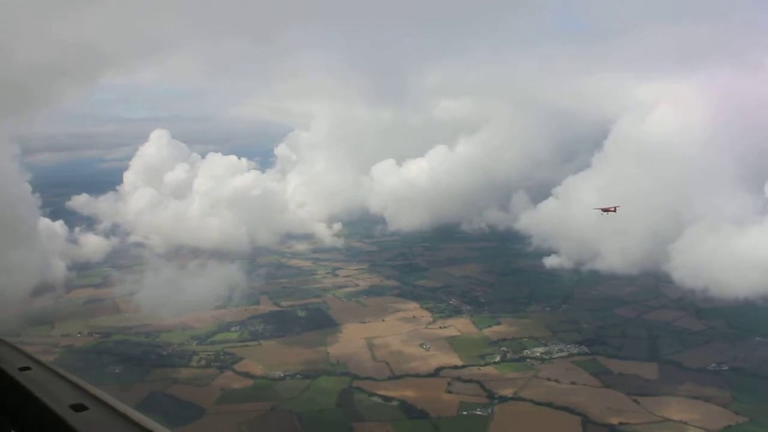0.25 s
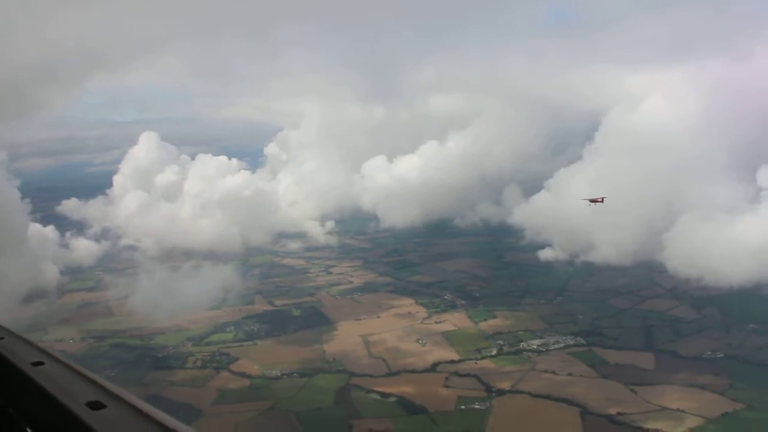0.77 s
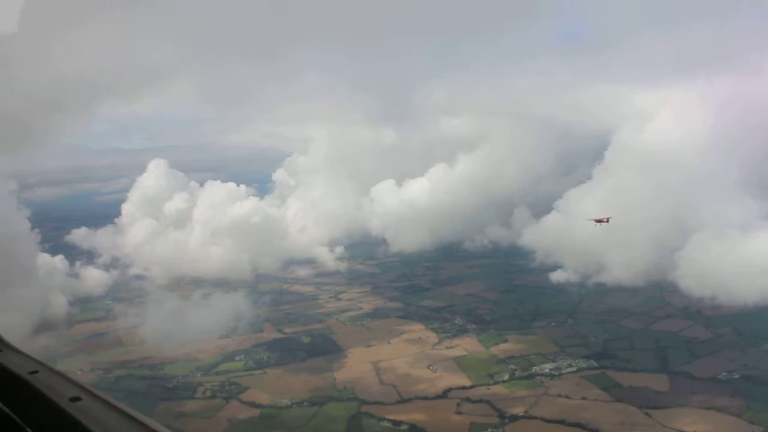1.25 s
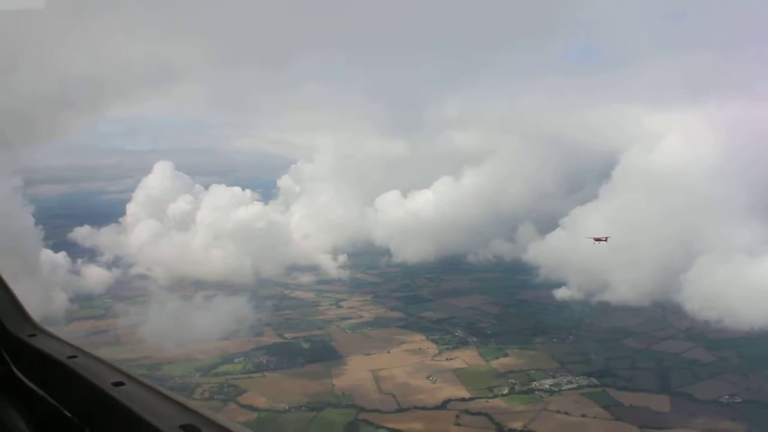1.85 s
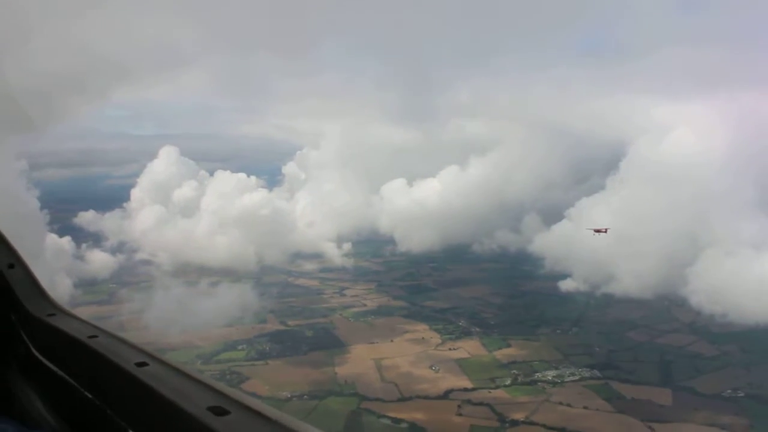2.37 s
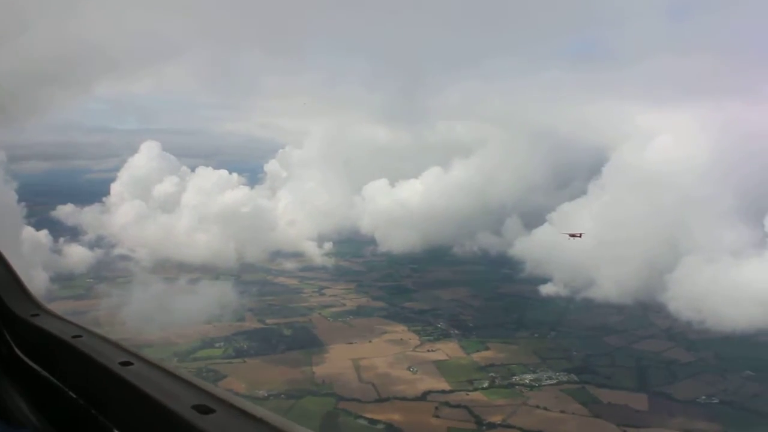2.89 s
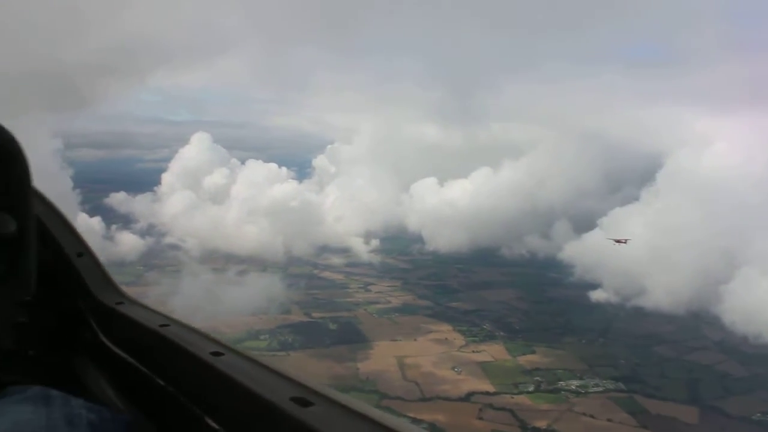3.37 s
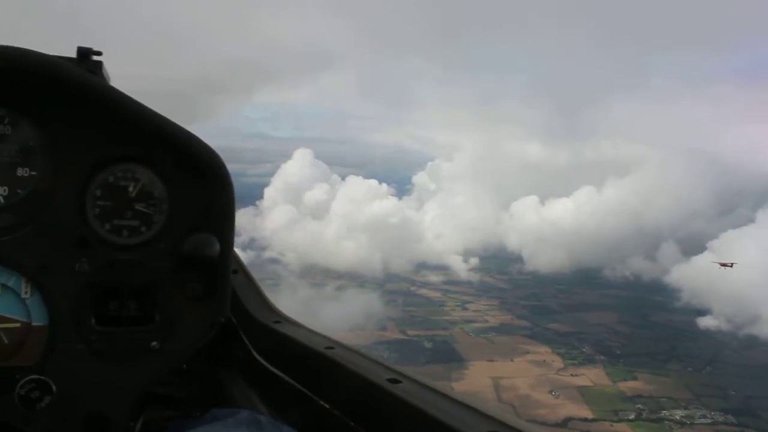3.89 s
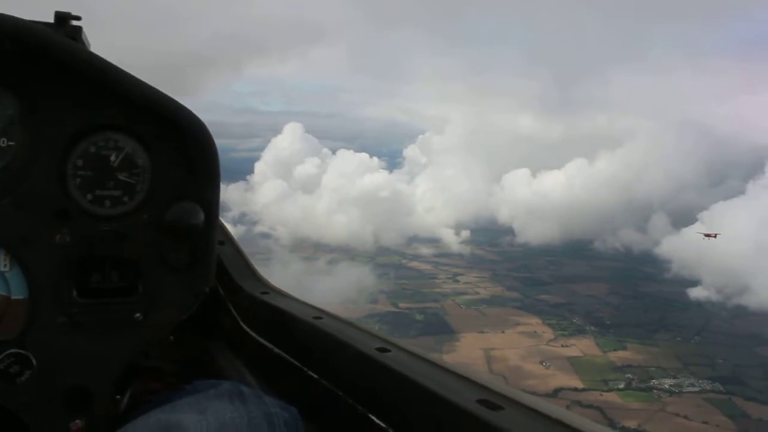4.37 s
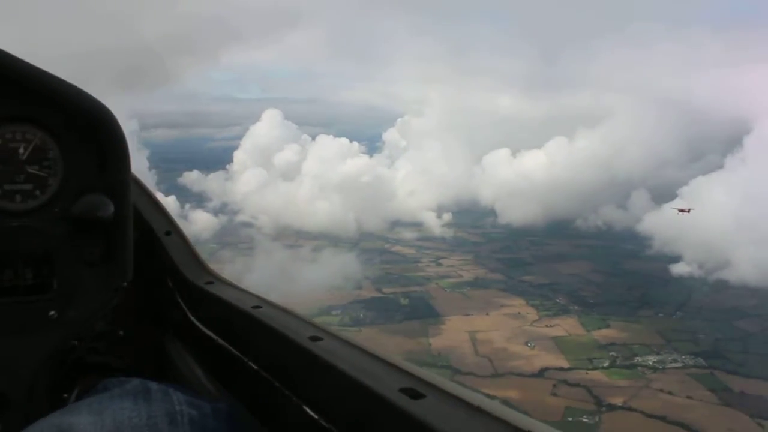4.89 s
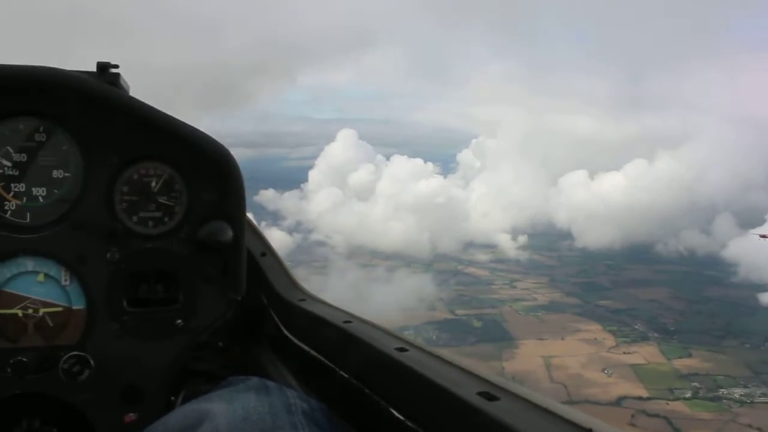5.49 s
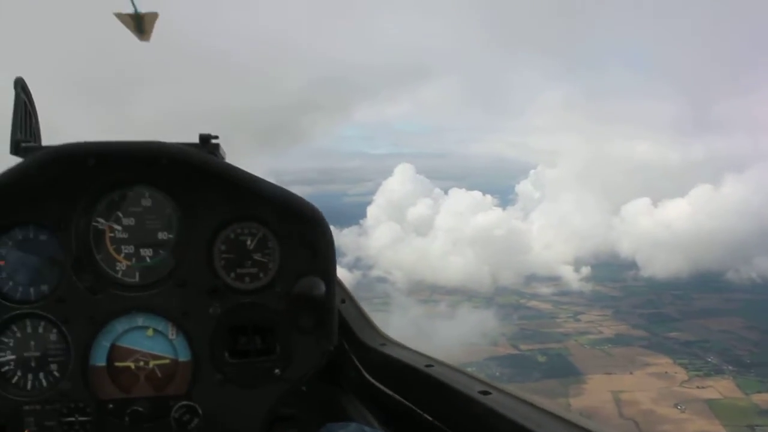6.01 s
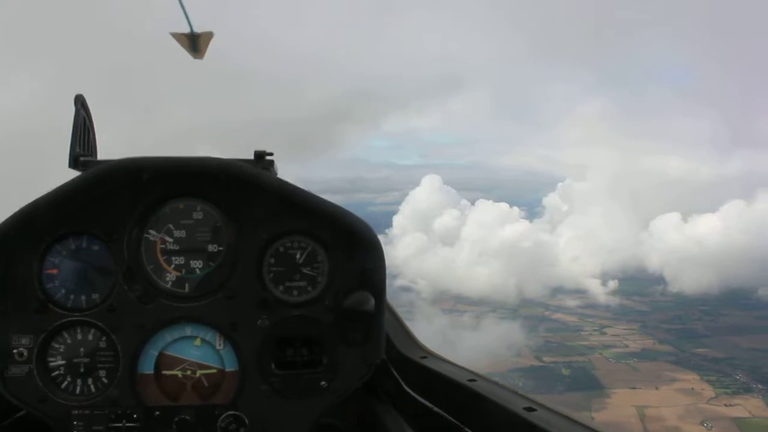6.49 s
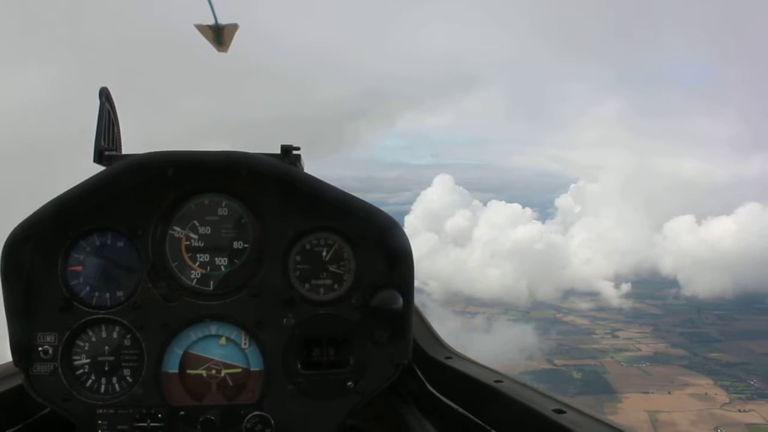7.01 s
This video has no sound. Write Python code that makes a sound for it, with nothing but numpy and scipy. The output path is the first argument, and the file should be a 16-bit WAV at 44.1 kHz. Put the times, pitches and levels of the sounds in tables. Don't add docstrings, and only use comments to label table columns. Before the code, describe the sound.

Low hull drumming dominates a small enclosed cockpit, with air hissing and roaring steadily along the canopy. The start is brighter and more gusty, with tiny dry ticks; then the deep cabin hum becomes steadier, swelling most near the middle. The close microphone turns, subtly changing the hollow colouring of the wind. Levels stay even and compressed, slightly overloaded, with one tiny bump, and the flow continues to the end.

```python
import sys
import numpy as np
from scipy import signal
from scipy.fft import rfft, irfft, next_fast_len
from scipy.io import wavfile
from scipy.ndimage import uniform_filter1d, map_coordinates

SR = 44100
rng = np.random.default_rng(int(sys.argv[2]) if len(sys.argv) > 2 else 0)


def invert_db(x):
    u = np.asarray(x, float) / 20
    return 10 ** u


def transcribe(signal):
    frames = np.atleast_2d(signal).T
    limited = np.clip(frames, -1, 1)
    pcm = np.round(limited * 32767).astype(np.int16)
    wavfile.write(sys.argv[1], SR, pcm)


N = 319725

# t/s, pose number 0-3
POSE_TRACK = [
    (0, 0),
    (1.5, 0),
    (2, 1),
    (3.3, 1),
    (3.6, 2),
    (4.6, 2),
    (4.8, 2.6),
    (5.7, 3),
    (7.25, 3),
]
# f/Hz, width/Hz, level/dB
POSE_PEAKS = [
    [(655, 23, 7), (790, 110, 9.5), (967, 150, 0.5), (1336, 62, 4), (1674, 29, 6.5), (1940, 280, -6.5),
     (2180, 140, 4), (2800, 78, 4.5), (3200, 340, -1.5), (4640, 780, -1)],
    [(778, 21, 6.5), (840, 15, 5), (1517, 29, 6), (1770, 200, -5.5), (1920, 32, 8), (2210, 240, 1.5),
     (2780, 130, -4.5), (3080, 80, 3.5), (5370, 250, 2.5), (6700, 300, 2)],
    [(567, 26, 3.5), (685, 17, 1.5), (840, 57, 3.5), (1130, 72, 4), (1376, 130, -5), (2050, 80, 2),
     (2500, 150, -4.5), (3220, 65, -6.5), (3500, 110, 0.5), (6840, 300, 0)],
    [(604, 39, 3.5), (880, 27, 3), (1360, 77, -2.5), (1645, 24, 7.5), (1740, 47, -5), (1798, 20, 5),
     (2300, 180, -2.5), (2593, 53, 3.5), (2720, 80, -3.5), (5300, 320, 2.5)],
]
# slipstream/dB, low roar/dB, fizz/dB, canopy/dB, buffet/dB, singing panel/dB
POSE_LEVELS = [
    (-31.5, -5, -14.5, -4, -39.5, -3),
    (-34.5, 0, -16, -8.5, -37.5, -2),
    (-34.5, .4, -15, -11, -38.5, -9),
    (-32, 0.5, -16.5, -12, -37, -11),
]
# t/s, swell/dB, half length/s
GUSTS = [(.08, 2.5, .015), (.22, 4, .025), (.29, 5, .022), (.44, 4.5, 0.023), (.61, 3.5, .03),
         (.69, 2.5, 0.032), (.98, 1.5, .05), (1.29, 1, 0.041), (1.37, -1.5, 0.014), (1.59, 7, 0.019),
         (1.67, 4, 0.018), (1.94, 4, 0.058), (2.13, 4.5, 0.096), (2.41, 3.5, .035), (2.6, 3, .06),
         (2.85, 2.5, 0.026), (3.38, 6, 0.027), (3.49, 5, .025), (3.57, 1.5, .02), (3.95, 4.5, 0.02),
         (4.33, 2.5, .015), (4.38, 6, .03), (4.71, 3, .07), (5.32, 3, .05), (5.56, 1.5, .025),
         (5.7, 2, 0.022), (5.8, 5.5, .035), (6.24, 1.5, 0.018), (6.925, 3, 0.018), (7.24, 6, 0.032)]
# t/s, drop/dB, half length/s
LULLS = [(.8, 3, 0.0088), (.92, 3, 0.018), (1.11, 2.5, 0.073), (1.33, 5.5, 0.016), (1.47, 4.5, 0.025),
         (1.8, 0, 0.052), (2.32, 1.5, 0.034), (2.47, 4, 0.019), (2.78, 0.5, 0.057), (4.19, 2.5, .04),
         (4.6, 2.5, .07), (6.01, 1.5, 0.042), (7.05, 1.5, 0.029)]
# t/s, peak level/dB
TICKS = [(0.079, -50.5), (0.2233, -36.5), (0.2817, -32), (0.3735, -51), (0.4314, -52.5), (0.4754, -54),
         (0.608, -31.5), (0.6379, -50), (0.725, -29.5), (0.8255, -42), (0.961, -56), (1.594, -37.5),
         (1.986, -37), (2.1294, -53), (2.6606, -45.5), (3.9494, -56), (4.36, -50), (5.3587, -42.5),
         (5.5533, -54), (5.9123, -52), (6.1988, -49.5), (6.5241, -51), (6.563, -47), (6.9173, -49)]
# f/Hz, width/Hz, level/dB
FITTING_MODES = [(10900, 600, 0), (12200, 1300, -8), (14500, 2500, -15)]
# t/s, level/dB
HUM_TRACK = [(0.0, -28), (0.08, -45.5), (0.18, -23.5), (0.55, -22.5), (0.91, -43), (1.29, -23), (1.9, -32),
             (1.98, -13.5), (2.04, -35.5), (2.14, -15), (2.32, -34), (2.52, -17), (3.03, -17),
             (3.29, -26.5), (4.68, -12), (5.67, -18), (6.88, -15.5), (7.25, -28.5)]
# f/Hz, density/dB per Hz
ROAR_SPECTRUM = [(380, -15), (520, -5), (600, -1.5), (717, -6.5), (880, -5.5), (1010, -7), (1630, -11.5),
                 (2160, -14), (2700, -16.5), (3600, -27.5), (5000, -37), (8000, -88)]
# f/Hz, density/dB per Hz
FIZZ_SPECTRUM = [(2000, -15.5), (3300, -1), (4000, -6), (5000, -10.5), (6800, -13.5), (8000, -19),
                 (10000, -27.5), (11000, -29.5), (15700, -38)]
# t/s, strength/dB, upper modes' part/dB
HULL_TRACK = [(0, -10.5, -4.5), (.3, -12, -8), (.8, -13, -5), (1.6, -14.5, -1), (1.9, -13, -7),
              (2.07, -13, -2.5), (2.28, -11.5, -12.5), (2.8, -13.5, -6.5), (3.7, -13.5, -3),
              (4.25, -14, -5.5), (4.55, -14, -9.5), (4.7, -22, -4), (4.85, -13.5, -8.5), (5.35, -14, -4.5),
              (6.1, -13, -6), (6.78, -15.5, -2.5), (6.97, -13, -12), (7.25, -11, -7.5)]
# f/Hz, width/Hz, level/dB
LOW_MODES = [(103.4, 19, -8.5), (136.24, 9.1, 2), (159.6, 20, -5.5), (195, 33.4, -12.5)]
# f/Hz, width/Hz, level/dB
UPPER_MODES = [(247, 16, -13), (286.5, 10, -2), (321.2, 15.2, 1.5), (351.4, 15.7, -0.5), (377.3, 25, -11.5)]
# f/Hz, width/Hz, level/dB
CANOPY_MODES = [(418.4, 43.5, -1.5), (457.2, 33.3, 0.5), (491.4, 45, -6)]
# f/Hz, width/Hz, level/dB
PANEL_MODES = [(352.2, 7, 0)]
# f/Hz, density/dB per Hz
BUFFET_SPECTRUM = [(20, -26), (35, -8), (50, 1.5), (90, -1), (230, -11.5), (500, -23.5), (700, -66)]
# t/s, length/s, level/dB
INPUT_JUMP = (4.5918, .0017, -23)

HUM_HZ = 69.35
FLUTTER_DB_PER_DB_WEAKER = 0.053
BUFFET_DB_PER_HUM_DB, CANOPY_DB_PER_GUST_DB = 0.4, 0.91
RISE_SHARE, FALL_SHARE = 0.66, 1.2
TAP_T60_S, RATTLE_T60_S = .003, .03
CABIN_T60_S = 0.072


def unit(x):
    return x / np.sqrt(np.mean(x ** 2) + 1e-20)


def curves(rows):
    t_s, *columns = np.transpose(rows)
    return [np.interp(np.arange(N) / SR, t_s, column) for column in columns]


def wobble(rate_hz):
    knots = rng.standard_normal(int(N * rate_hz / SR) + 4)
    return map_coordinates(knots, [np.arange(N) * rate_hz / SR])


def filtered(x, response):
    size = next_fast_len(N + SR // 2)
    return irfft(rfft(x, size) * response(np.fft.rfftfreq(size, 1 / SR)), size)[:N]


def colour(spectrum):
    f_hz, level_db = np.transpose(spectrum)
    return lambda f: invert_db(np.interp(np.log(f + 1), np.log(f_hz + 1), level_db))


def modes(table):
    def response(f):
        total = 0
        for k, (centre, width, db) in enumerate(table):
            total = total + (-1) ** k * invert_db(db) * 1j * f * width / (centre ** 2 - f ** 2 + 1j * f * width)
        return total
    return response


def rush(response, patchy_db):
    spectra = signal.stft(rng.standard_normal(N + 512), nperseg=512)[2]
    field = uniform_filter1d(rng.standard_normal(spectra.shape), size=5, axis=0)
    field = uniform_filter1d(field, size=10, axis=1)
    patchy = signal.istft(spectra * invert_db(patchy_db * unit(field)), nperseg=512)[1][:N]
    return unit(filtered(patchy, response))


def by_pose():
    pose, = curves(POSE_TRACK)
    return [np.interp(pose, range(len(POSE_LEVELS)), column) for column in np.transpose(POSE_LEVELS)]


def bells(rows, t):
    total_db = np.zeros(len(t))
    for s, db, half_s in rows:
        span_s = half_s * np.where(t < s, RISE_SHARE, FALL_SHARE)
        total_db += db * np.exp(-((t - s) / span_s) ** 2)
    return total_db


def gusts():
    t = np.arange(0, N / SR, .002)
    return np.interp(np.arange(N) / SR, t, bells(GUSTS, t) - bells(LULLS, t))


def fitting():
    taps, t = np.zeros(N + SR), np.arange(SR // 20) / SR
    decay = invert_db(-60 * t / TAP_T60_S) + 0.41 * invert_db(-60 * t / RATTLE_T60_S)
    for s, db in TICKS:
        taps[round(s * SR):][:len(t)] += invert_db(db + 6.5) * decay * rng.standard_normal(len(t))
    highpass = lambda f: 1 / (1 + (10000 / (f + 1)) ** 14)
    return filtered(taps[:N], lambda f: modes(FITTING_MODES)(f) * highpass(f))


def hum():
    level_db, = curves(HUM_TRACK)
    phase = 2 * np.pi * HUM_HZ * np.arange(N) / SR + 0.2 * wobble(3.3)
    flutter_db = (1.15 + FLUTTER_DB_PER_DB_WEAKER * (level_db.max() - level_db)) * wobble(8.4)
    note = np.sin(phase) + invert_db(-6.0) * np.sin(2 * phase)
    return invert_db(level_db + 2.0 + flutter_db) * note


def cabin(x):
    pose, = curves(POSE_TRACK)
    t, out = np.arange(SR // 10) / SR, np.zeros(N)
    for k, table in enumerate(POSE_PEAKS):
        ring = rng.standard_normal(len(t)) * invert_db(-60 * t / CABIN_T60_S)
        ring = ring / np.linalg.norm(ring)
        wet = x + invert_db(-11) * signal.fftconvolve(x, ring)[:N]
        shape = lambda f: invert_db(sum(db * np.exp(-((f - c) / w) ** 2) for c, w, db in table))
        nearness = np.clip(1 - np.abs(pose - k), 0, 1)
        out += nearness * filtered(wet, shape)
    return out


def slipstream():
    steady_db, low_db, fizz_db, *_ = by_pose()
    level_db = steady_db + gusts() + .5 * wobble(25)
    eddies = 0.12 * wobble(40) + 0.62 * wobble(110) + 0.56 * wobble(200)
    roar = rush(colour(ROAR_SPECTRUM), patchy_db=0.46)
    deep = filtered(roar, lambda f: 1 / (1 + (f / 900) ** 4))
    roar = roar + (invert_db(low_db) - 1) * deep
    calm_db = -.25 * (level_db - uniform_filter1d(level_db, size=SR // 2))
    fizz_db = fizz_db + calm_db + .3 * eddies + 1.1 * wobble(120)
    fizz = invert_db(fizz_db) * rush(colour(FIZZ_SPECTRUM), patchy_db=.8)
    return invert_db(level_db + 2.5 + 1.46 * eddies) * cabin(roar + fizz)


def locked(x, grip):
    swing = np.sqrt(np.abs(uniform_filter1d(x ** 2, size=SR // 30))) + 0.13
    return unit(x / swing ** grip)


def shaken(table, patchy_db):
    steep = lambda f: 1 / (1 + (85 / (f + 1)) ** 8 + (f / 600) ** 6)
    return rush(lambda f: modes(table)(f) * steep(f), patchy_db)


def hull():
    strength_db, part_db = curves(HULL_TRACK)
    upper_db = strength_db + part_db
    low_db = strength_db + 10 * np.log10(np.clip(1 - invert_db(2 * part_db), .1, 1))
    *_, canopy_db, buffet_db, panel_db = by_pose()
    canopy_db = canopy_db + upper_db + CANOPY_DB_PER_GUST_DB * gusts()
    hum_db, = curves(HUM_TRACK)
    buffet_db = buffet_db + BUFFET_DB_PER_HUM_DB * (hum_db - hum_db.mean())
    low = invert_db(low_db + 0.07) * locked(shaken(LOW_MODES, patchy_db=-2.0), grip=0.27)
    upper = invert_db(upper_db - 0.8) * locked(shaken(UPPER_MODES, patchy_db=3.0), grip=0.14)
    canopy = invert_db(canopy_db - 0.23) * shaken(CANOPY_MODES, patchy_db=1.1)
    panel = invert_db(upper_db + panel_db) * locked(shaken(PANEL_MODES, patchy_db=0.0), grip=0.27)
    buffet = invert_db(buffet_db + 9.5) * rush(colour(BUFFET_SPECTRUM), patchy_db=3.2)
    return low + upper + canopy + panel + buffet


def scene():
    return (fitting() + hum() + slipstream() + hull())[None]


def low_pass(x):
    return signal.sosfilt(signal.butter(12, 15720, fs=SR, output="sos"), x)


def record(dry):
    power = np.abs(uniform_filter1d(dry ** 2, size=1800, axis=1)) + 1e-9
    x = invert_db(-0.08) * dry * (power / np.mean(power)) ** -.12
    jump_s, length_s, jump_db = INPUT_JUMP
    x[:, round(jump_s * SR):round((jump_s + length_s) * SR)] += invert_db(jump_db)
    clipped = x / (1 + np.abs(x / .716) ** 24) ** (1 / 24)
    return low_pass(clipped)


dry = scene()
out = record(dry)
transcribe(out)
```